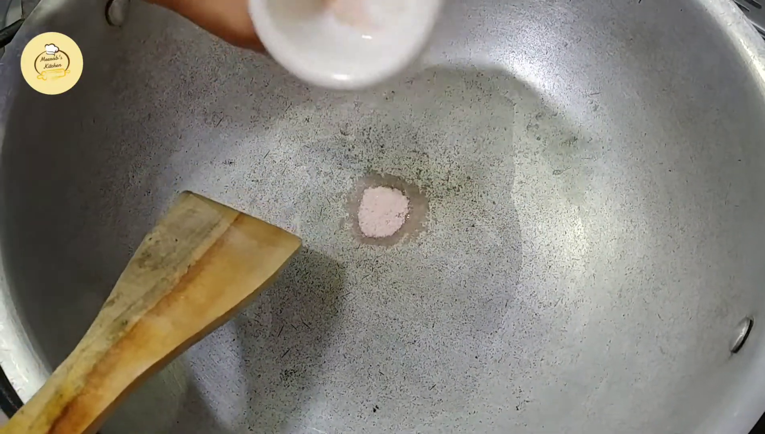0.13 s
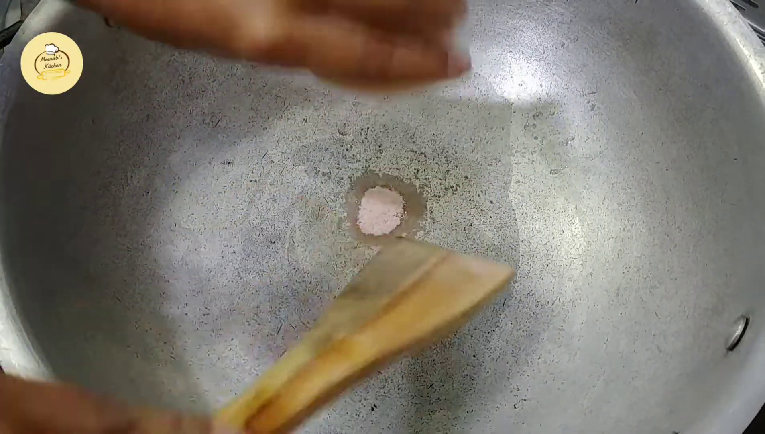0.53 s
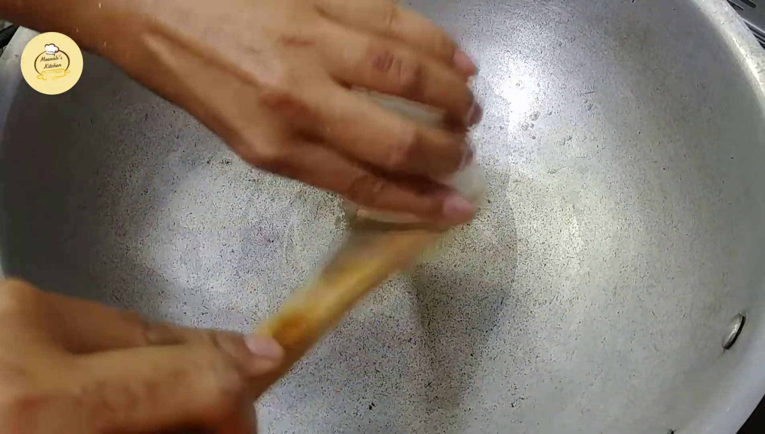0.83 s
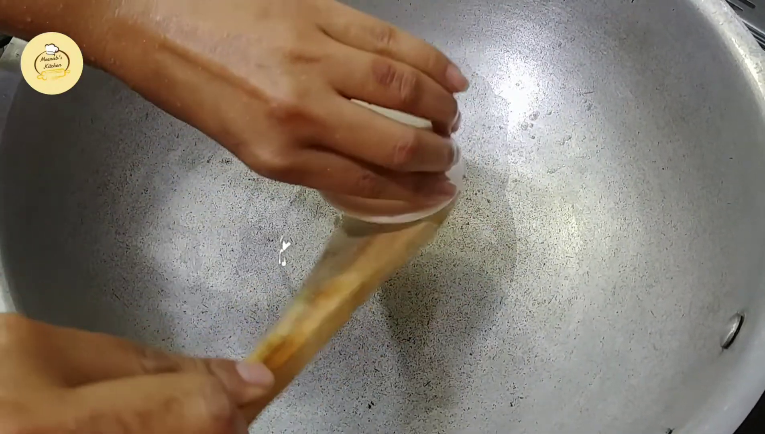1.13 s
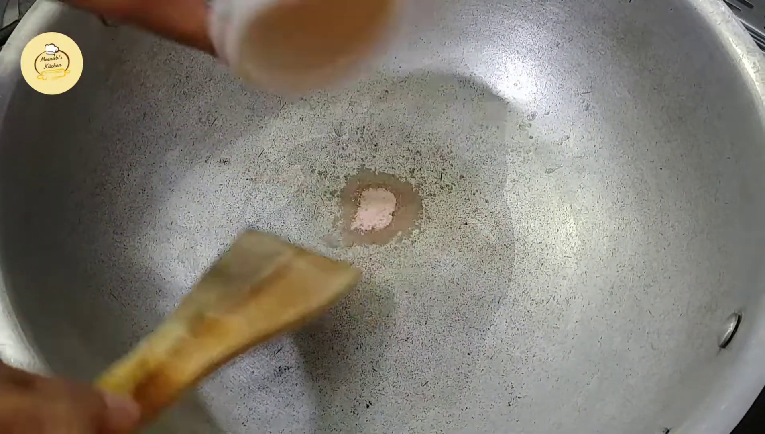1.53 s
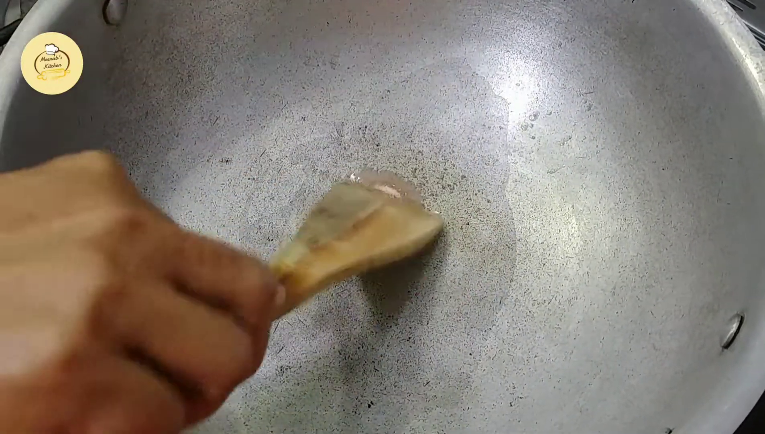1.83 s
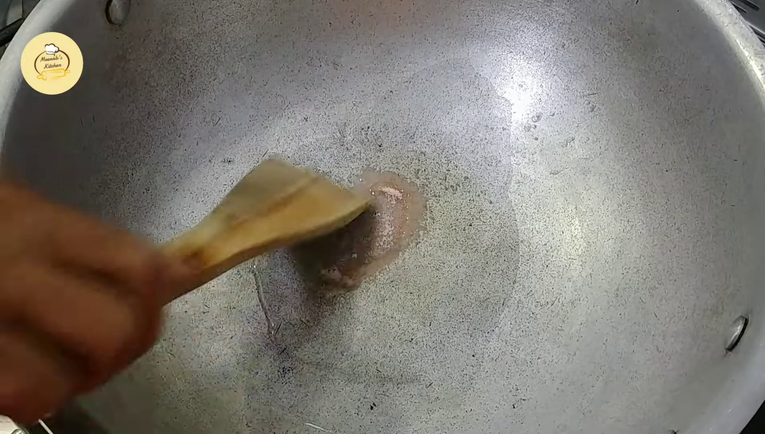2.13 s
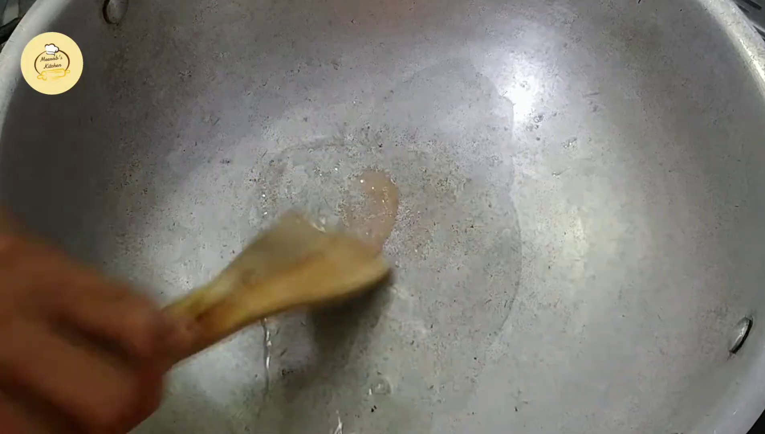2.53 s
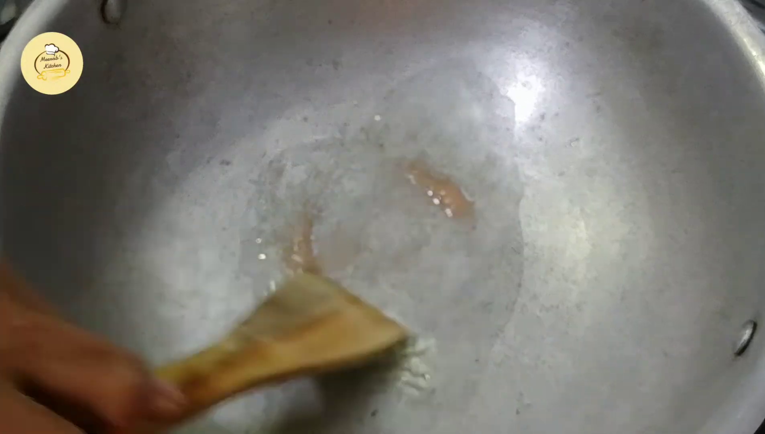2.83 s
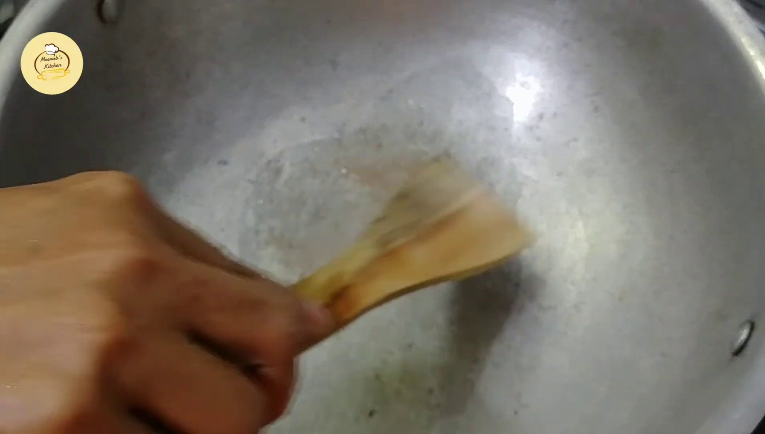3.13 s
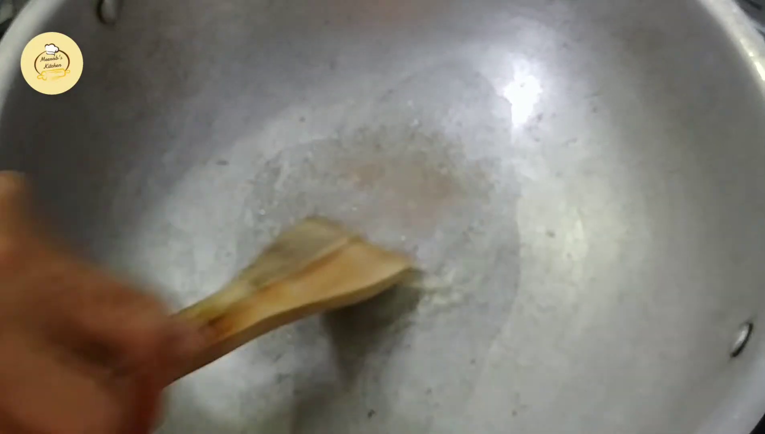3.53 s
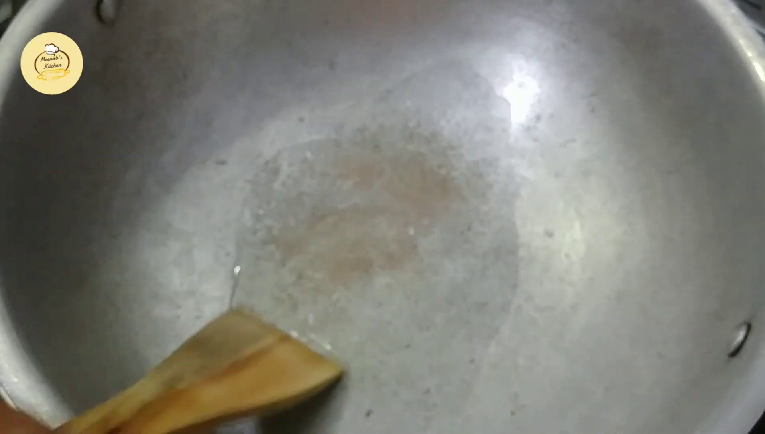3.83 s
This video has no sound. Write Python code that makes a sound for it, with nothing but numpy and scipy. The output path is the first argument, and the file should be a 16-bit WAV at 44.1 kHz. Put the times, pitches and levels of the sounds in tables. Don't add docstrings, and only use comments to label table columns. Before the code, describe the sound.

A wooden spatula scrapes a hot metal pan. First a small cup touches it lightly and knocks it hard three times, then come gritty strokes, clunks and sizzle, heard close in a small hard kitchen.

```python
import sys
import numpy as np
from scipy import signal
from scipy.io import wavfile
from scipy.ndimage import uniform_filter1d

SR = 44100
rng = np.random.default_rng(int(sys.argv[2]) if len(sys.argv) > 2 else 0)


def dump(signal):
    limited = np.clip(np.atleast_2d(signal).T, -1, 1)
    pcm = np.round(limited * 32767).astype(np.int16)
    wavfile.write(sys.argv[1], SR, pcm)


def boost_factor(decibels):
    exponent = np.asarray(decibels, float) / 20
    return 10 ** exponent


N = 176400


def evened(x):
    return x / np.sqrt(np.mean(x ** 2) + 1e-20)


def read(points, hz):
    point_hz, value = np.transpose(points)
    return np.interp(np.log(hz + 1), np.log(point_hz + 1), value)


def add(mix, start_s, sound):
    part = mix[round(start_s * SR):][:len(sound)]
    part += sound[:len(part)]


def coloured(x, *spectra):
    hz = abs(np.fft.fftfreq(4096, 1 / SR))
    log_gain = np.log(boost_factor(sum(read(s, hz) for s in spectra)))
    response = np.exp(np.conj(signal.hilbert(log_gain)))
    taps = np.fft.ifft(response).real[:2048]
    return signal.oaconvolve(x, taps)[:len(x)]


def resonate(x, hz, width_hz):
    turn = np.exp(2j * np.pi * np.cumsum(hz * np.ones(len(x))) / SR)
    r = np.exp(-np.pi * width_hz / SR)
    return 2 * (turn * signal.lfilter([1 - r], [1, -r], x / turn)).real


def grains(per_s, spread_db):
    size = boost_factor(spread_db * np.minimum(rng.exponential(1, N), 5))
    sign = rng.choice([-1, 1], N)
    return evened(size * sign * (rng.random(N) < per_s / SR))


def drift(slow_s):
    steps = rng.standard_normal(N // 64 + 2)
    steps = uniform_filter1d(steps, max(round(slow_s * SR / 64), 1))
    steps = evened(uniform_filter1d(steps, 3))
    return np.interp(np.arange(N) / 64, np.arange(len(steps)), steps)


def ring(hz, db, t60, soft_s, spread):
    t = np.arange(0, .3, 1 / SR)[:, None]
    near = hz * (1 + spread * rng.uniform(-0.73, 1, (2, len(hz))))
    tones = np.sin(2 * np.pi * hz * t)
    tones += 0.45 * np.sin(2 * np.pi * near[0] * t)
    tones -= 0.89 * np.sin(2 * np.pi * near[1] * t)
    x = (boost_factor(db - 60 * t / t60) * tones).sum(1)
    x *= np.minimum(t[:, 0] / soft_s, 1)
    return x / abs(x).max()


# pitch_hz, likeness_0_to_1
LIKENESS = [(60, 0.82), (300, 0.95), (700, 0.56), (2000, 0.033), (12000, 0.033)]
# pitch_hz, t60_s
KITCHEN_T60 = [(150, 0.55), (1000, 0.35), (2000, 0.3), (4000, 0.28), (12000, 0.23)]


def room(x, wet_db):
    length = SR // 2
    taps = np.zeros((2, length))
    jitter = rng.integers(0, 20, (2, (length - 31) // 20))
    at = np.arange(30, length - 20, 20) + jitter
    np.put_along_axis(taps, at, rng.choice([-1., 1.], at.shape), 1)
    taps *= 1 + np.exp(-np.arange(length) / SR / 0.0033)
    hz, t, z = signal.stft(taps, SR, nperseg=256)
    same = np.clip(read(LIKENESS, hz), 0, 1)[:, None]
    z = np.array([z[0], same * z[0] + np.sqrt(1 - same ** 2) * z[1]])
    fade = boost_factor(-60 * t / read(KITCHEN_T60, hz)[:, None])
    tail = signal.istft(z * fade, SR, nperseg=256)[1]
    tail = tail / np.linalg.norm(tail[0])
    return x + boost_factor(wet_db) * signal.fftconvolve(x[None], tail, axes=1)[:, :N]


# pitch_hz, level_db
ROOM_TONE = [(25, -29), (60, 1), (250, -4.5), (600, -13), (1300, -21.5), (3000, -26.5), (9000, -32.5),
             (12000, -11.5)]


def air():
    tone_db, patch_db = -42, 2.85
    hum_hz, hum_width_hz, hum_db = 98.1, 8.7, -46.5
    frames, hz = N // 256 + 5, np.fft.rfftfreq(1024, 1 / SR)
    a, b, c, d, patches = rng.standard_normal((frames, 513, 5)).T
    patches = uniform_filter1d(patches, 8, 0)
    patches = evened(uniform_filter1d(patches, 12, 1))
    same = np.clip(read(LIKENESS, hz), -1, 1)[:, None]
    left = a + 1j * b
    right = same * left + np.sqrt(1 - same ** 2) * (c + 1j * d)
    z = np.array([left, right]) * boost_factor(read(ROOM_TONE, hz)[:, None] + patch_db * patches)
    tone = signal.istft(z, nperseg=1024, noverlap=768)[1][:, :N]
    hum = resonate(rng.standard_normal(N), hum_hz, hum_width_hz)
    hum = resonate(hum, hum_hz, 16 * hum_width_hz)
    return boost_factor(tone_db) * evened(tone) + boost_factor(hum_db) * evened(hum)


# start_s, level_db
SIZZLE_LEVEL = [(0, -64), (1.671, -69), (1.688, -53.5), (2.15, -56.5), (2.4, -40.5), (3.2, -44),
                (3.398, -45.5), (4.0, -51)]
# pitch_hz, level_db
BUBBLE_COLOUR = [(500, -20), (2500, -9.5), (5000, -16), (8000, 7), (16000, -6)]


def bubbles():
    pops = grains(1100, 2.5)
    return evened(coloured(pops + 0.75 * rng.standard_normal(N), BUBBLE_COLOUR))


def sizzle():
    start_s, level_db = np.transpose(SIZZLE_LEVEL)
    shared = bubbles()
    own = np.array([bubbles(), bubbles()])
    swell = boost_factor(np.interp(np.arange(N) / SR, start_s, level_db))
    return swell * (0.1 * shared + 1.68 * own)


# start_s, peak_db, centre_hz of the blow, width_octaves, clack_db
BUMP_EVENTS = [(0.045, -39.5, 246, 0.45, -20), (.66, -44, 350, 1.6, -28), (1.795, -24, 438, 1.25, 0.5),
               (1.832, -30.5, 197, 3, -30), (2.05, -32.5, 305, 0.67, -30), (2.318, -36.5, 256, 0.56, -26),
               (2.534, -32, 132, 0.43, -52), (2.841, -11, 330, 1.1, -2), (2.853, -14.5, 260, 1, -13),
               (2.871, -14.5, 420, 1.3, -25), (2.945, -18.5, 198, 2, -15), (3.061, -17.5, 800, 0.99, 11.5),
               (3.075, -13.5, 260, 1.95, 4.5), (3.11, -26, 268, 0.59, -10), (3.4, -30, 240, 1.5, -20),
               (3.783, -21, 742, 0.33, -9.5), (3.784, -27.5, 300, 1, -1), (3.835, -25, 110, 0.89, -36),
               (3.857, -20.5, 395, 1.1, 0)]
# pitch_hz, level_db, t60_s
PAN_MODES = [(106, 13, 0.024), (216, 4, 0.031), (254.7, 0, 0.17), (340, 3.5, 0.057), (420, 3, 0.03),
             (532, 0.5, 0.056), (663, -0.5, .05), (731, -4, 0.096), (852, -4, 0.11), (1088, -11, 0.08),
             (1580, -18, 0.047), (2350, -9, 0.071), (2950, -25, .08)]


def bumps():
    clack_t60, thud_t60, thud_db = 0.098, 0.053, -4.5
    hz, db, t60 = np.transpose(PAN_MODES)
    out, t = np.zeros(N), np.arange(5000) / SR
    wood = signal.butter(4, [900, 3700], "band", fs=SR, output="sos")
    for start_s, peak_db, centre_hz, octaves, clack_db in BUMP_EVENTS:
        pitch = 1 + 0.019 * rng.standard_normal(len(hz))
        mode_db = db - 12 * (np.log2(hz / centre_hz) / octaves) ** 2
        add(out, start_s, boost_factor(peak_db) * ring(hz * pitch, mode_db, t60, 0.0013, 0.035))

        clack = signal.sosfilt(wood, rng.standard_normal(len(t)))
        add(out, start_s, boost_factor(peak_db + clack_db - 60 * t / clack_t60) * clack)

        width_hz = centre_hz * octaves
        thud = resonate(rng.standard_normal(len(t)), centre_hz, width_hz)
        thud = evened(resonate(thud, centre_hz, width_hz)) * np.minimum(t / 0.0023, 1)
        narrow_db = min(20 * np.log10(octaves), 0)
        add(out, start_s, boost_factor(peak_db + thud_db + narrow_db - 60 * t / thud_t60) * thud)
    return room(out, -2)


# start_s, peak_db, low_boost_db, treble_boost_db, pitch_factor
KNOCK_EVENTS = [
    (0.653, -37.5, 14, 12, 0.95),
    (0.8651, -4, -3, -4.5, 1.033),
    (1.0563, -5.5, 1.5, 3, 0.98),
    (1.216, -7.5, 2, -2.5, 1.0),
]
# pitch_hz, level_db, t60_s
CUP_MODES = [(330, -15.5, 0.025), (800, -18, 0.014), (966, 1.5, 0.019), (1000, -6, 0.03),
             (1360, -12.5, 0.038), (1562, 4.5, 0.019), (1660, 1.5, 0.024), (1768, 2.5, 0.018),
             (2425, -5.5, 0.011), (2610, -6, 0.0059), (3045, -16, 0.046), (4550, -28, 0.013),
             (5930, -22.5, 0.021)]
# delay_s, left_db, right_db
WALL_ECHOES = [(.0092, -6.5, -13), (.0150, -3, -16), (.0238, -11, -2), (.039, -6, -9)]


def knocks():
    hz, db, t60 = np.transpose(CUP_MODES)
    t = np.arange(1500) / SR
    out = 0
    for start_s, peak_db, low_db, treble_db, pitch in KNOCK_EVENTS:
        one = np.zeros(N)
        treble = (hz > 2900) - 1. * (abs(hz - 2600) < 300)
        mode_db = db + low_db * (hz < 1100) + treble_db * treble
        add(one, start_s, boost_factor(peak_db + 0.5) * ring(hz * pitch, mode_db, t60, 0.0004, 0.03))

        crack = resonate(rng.standard_normal(len(t)), 3600, 1900)
        add(one, start_s, boost_factor(peak_db - 16 + treble_db - 60 * t / 0.064) * crack)

        out = out + room(one, 5)
        for k, (delay_s, *port_db) in enumerate(WALL_ECHOES):
            polarity = np.array([[1], [(-1) ** k]])
            out = out + boost_factor(port_db)[:, None] * polarity * np.roll(one, round(delay_s * SR))
    return out


# start_s, peak_db, pitch_hz, t60_s
CATCH_EVENTS = [(0.997, -42, 8300, 0.027), (1.681, -40.5, 8400, 0.019), (1.862, -16, 7500, 0.014),
                (1.979, -17.5, 4430, 0.037), (2.204, -26, 7200, 0.022), (2.28, -2, 7560, 0.0052),
                (2.28, -16, 2700, 0.022), (2.324, -10.5, 7100, 0.016), (2.329, -7, 3180, 0.012),
                (2.413, -8, 7550, 0.019), (2.43, -16, 2080, 0.016), (2.603, -12, 6100, 0.035),
                (2.611, -10, 7700, .015), (2.62, -10.5, 6250, .02), (2.714, -6, 8200, 0.013),
                (2.74, -11.5, 2830, 0.018), (2.766, -8, 7900, 0.013), (2.806, -10.5, 7540, 0.016),
                (2.994, -18, 2750, .02), (3.397, -34, 3000, 0.014), (3.465, -3, 7730, 0.013),
                (3.481, -9, 7200, .01), (3.513, -5.5, 8350, 0.0074), (3.524, -22, 7800, 0.0066),
                (3.576, -24, 8530, .012), (3.894, -20, 7800, 0.0087), (3.915, -13, 2650, 0.04),
                (3.963, -7.5, 7470, 0.013)]


def catches():
    out, t = np.zeros(N), np.arange(1300) / SR
    for start_s, peak_db, hz, t60 in CATCH_EVENTS:
        puff = rng.standard_normal(len(t)) * boost_factor(-60 * t / t60) * np.minimum(t / 0.0012, 1)
        snap = 7 * resonate(puff, hz, 800) + 0.15 * puff
        add(out, start_s, boost_factor(peak_db - 6 - read(PORT_COLOUR, hz)) * snap)
    return room(out, -0.5)


# start_s, pressure_db, brightness_db
STROKE_TABLES = [
    [(1.797, -35, -2.5), (1.84, -47, 1.5), (1.87, -35.5, 2.5), (1.95, -50, 7.5), (1.985, -34.5, 6.5),
     (2.04, -40.5, -8), (2.07, -76, -15)],
    [(2.205, -59.5, 16), (2.25, -39.5, 6.5), (2.28, -34.5, 7.5), (2.3, -29.5, 0.5), (2.42, -36, 6.5),
     (2.5, -35.5, 1), (2.58, -22, -0.5), (2.62, -34, 13.5), (2.69, -30.5, -9)],
    [(2.705, -35, 11.5), (2.76, -26, -1.5), (2.82, -50, 20), (2.85, -19.5, -7), (2.93, -38, 7),
     (3.0, -24.5, 1.5), (3.04, -34.5, -9), (3.07, -19, -11), (3.12, -33, -12)],
    [(3.399, -47.5, 9.5), (3.455, -43, 13), (3.48, -36, 12), (3.52, -28, 3), (3.55, -80, 1), (3.6, -80, -3)],
    [(3.857, -37, -2), (3.88, -24.5, -3.5), (3.92, -28.5, 0.5), (3.95, -25.5, -5), (4.0, -37.5, 0)],
]
# pitch_hz, width_hz, level_db
WALL_RINGS = [(1276, 180, -13), (1485, 126, -5), (2150, 104, -4), (2448, 220, -9), (2830, 130, -6),
              (3215, 51, -22), (4474, 76, -8.5), (5233, 133, -15.5), (6100, 44, -17)]
# pitch_hz, level_db
SCRAPE_COLOUR = [(35, -1), (80, 1), (250, -5.5), (800, -10), (1500, -6.5), (2500, -5), (6000, -4),
                 (16000, -4)]


def scrape():
    t, level, bright = np.arange(N) / SR, np.zeros(N), np.zeros(N)
    for rows in STROKE_TABLES:
        start_s, pressure_db, brightness_db = np.transpose(rows)
        landing = np.clip((t - start_s[0]) / 0.0011, 0, 1)
        lifting = np.clip((start_s[-1] - t) / 0.057 + 1, 0, 1)
        level += landing * lifting * boost_factor(np.interp(t, start_s, pressure_db))
        bright += landing * lifting * boost_factor(np.interp(t, start_s, pressure_db + brightness_db))

    judder = boost_factor(3 * drift(0.006))
    rough = grains(2700, 3)
    slips = evened(judder * (0.5 * rng.standard_normal(N) + 0.5 * rough))
    low = signal.sosfilt(signal.butter(2, 3600, fs=SR, output="sos"), slips)
    drive = level * low + bright * (slips - low)

    wall = drive.copy()
    for hz, width_hz, db in WALL_RINGS:
        strength = boost_factor(db + 14.5 + 6 * drift(0.064))
        wall += strength * resonate(drive, hz * (1 + 0.03 * drift(0.11)), width_hz)
    return room(coloured(wall, SCRAPE_COLOUR), 5.5)


def scene():
    lean = np.array([[.5], [-.5]])
    cup = knocks() * boost_factor(-3 * lean)
    spatula = (catches() + scrape()) * boost_factor(0.5 * lean)
    return air() + sizzle() + bumps() + cup + spatula


def low_pass(x):
    return signal.sosfilt(signal.butter(12, 15830, fs=SR, output="sos"), x)


# pitch_hz, level_db
PORT_COLOUR = [(6800, 0), (7900, 8.5), (8600, 0), (9500, -9), (10100, -22.5), (11100, -20), (11800, -20),
               (16000, -19.5)]
# pitch_hz, left_over_right_db
LEFT_OVER_RIGHT = [(60, 2.5), (150, 2), (900, 2.5), (2600, 1), (4000, 1.5), (8500, 8), (12000, 0.5)]
# pitch_hz, level_db
BAND_EDGES = [(25, -22), (45, -10), (70, 0), (15600, 0), (15900, -60)]


def record(dry):
    lag = 6
    half = np.array(LEFT_OVER_RIGHT) * [1, .5]
    left = coloured(dry[0], PORT_COLOUR, BAND_EDGES, half)
    right = coloured(dry[1], PORT_COLOUR, BAND_EDGES, half * [1, -1])
    right = np.pad(right, (lag, 0))[:N]
    mix = np.clip([left, right], -1, 1)
    return low_pass(mix)


dry = scene()
out = record(dry)
dump(out)
```